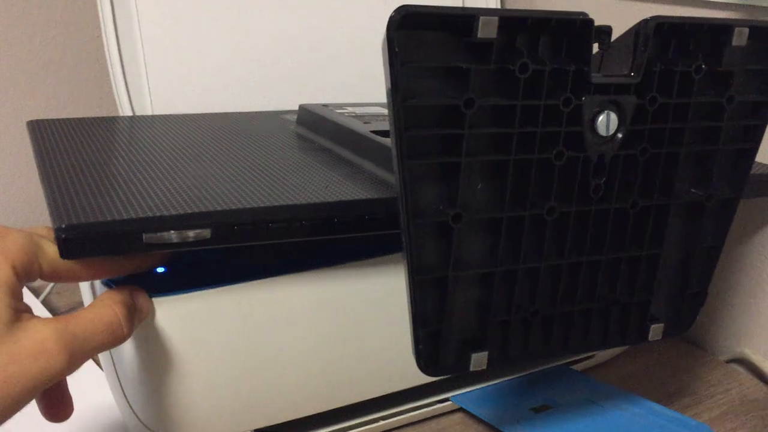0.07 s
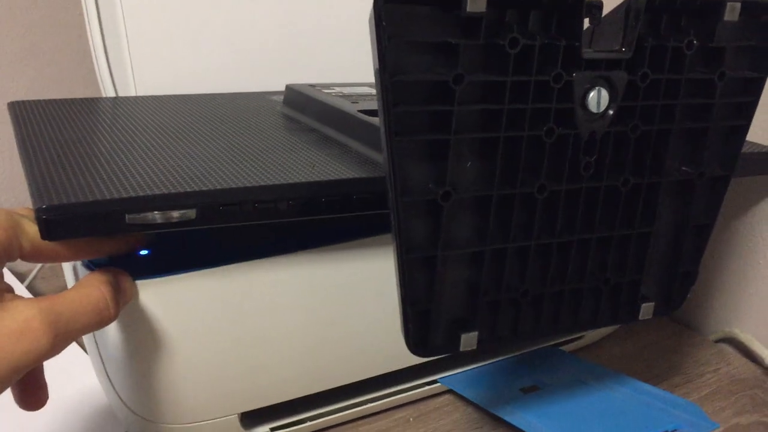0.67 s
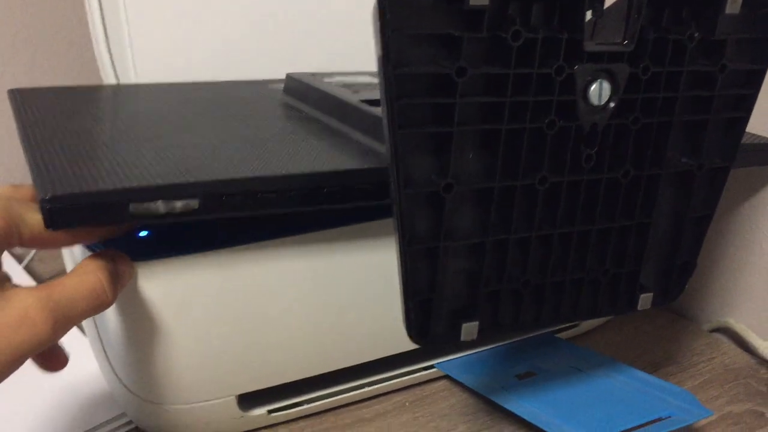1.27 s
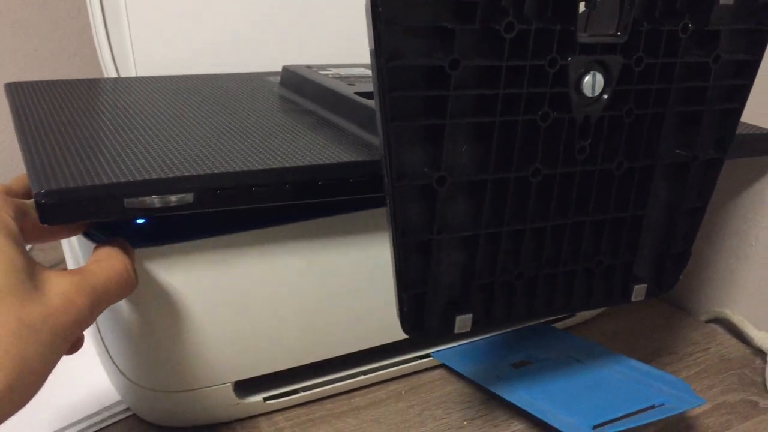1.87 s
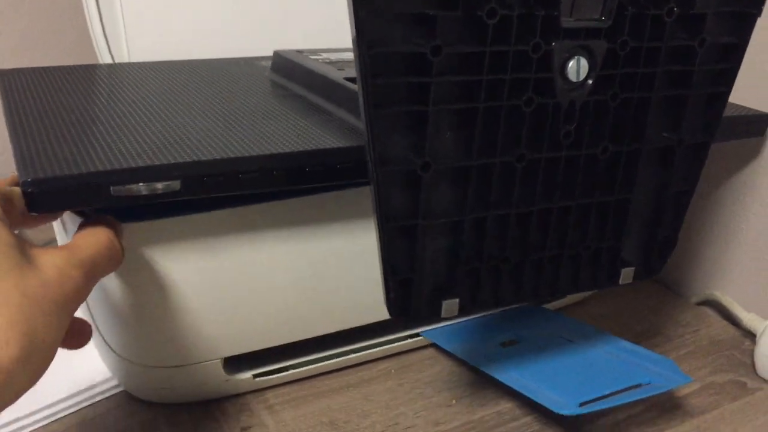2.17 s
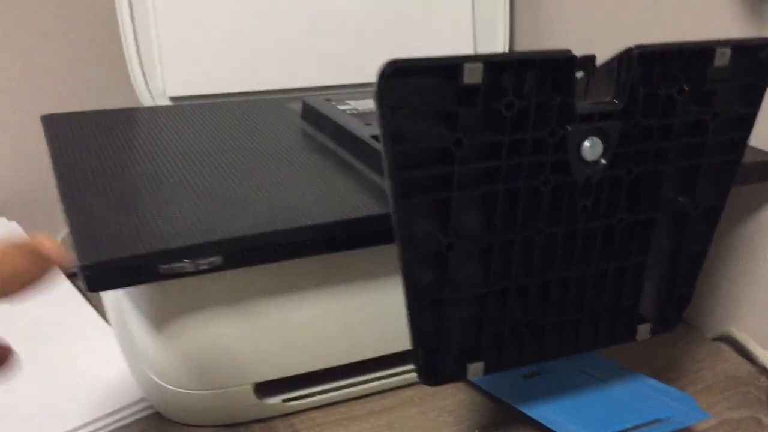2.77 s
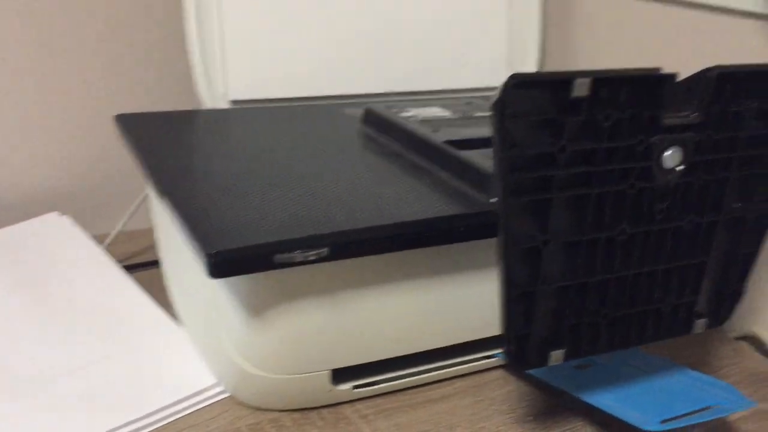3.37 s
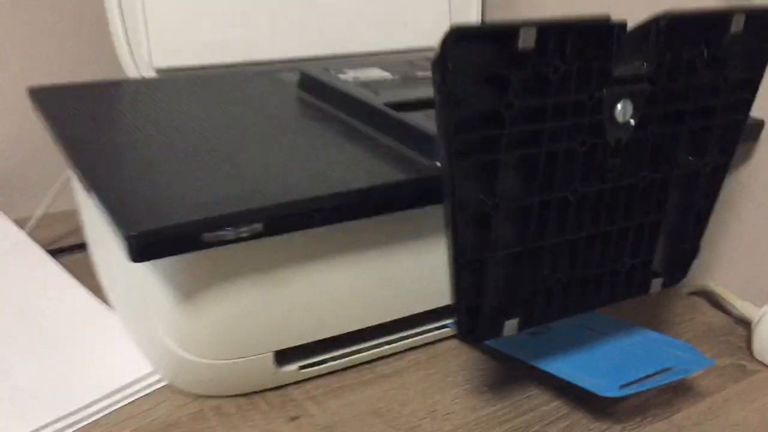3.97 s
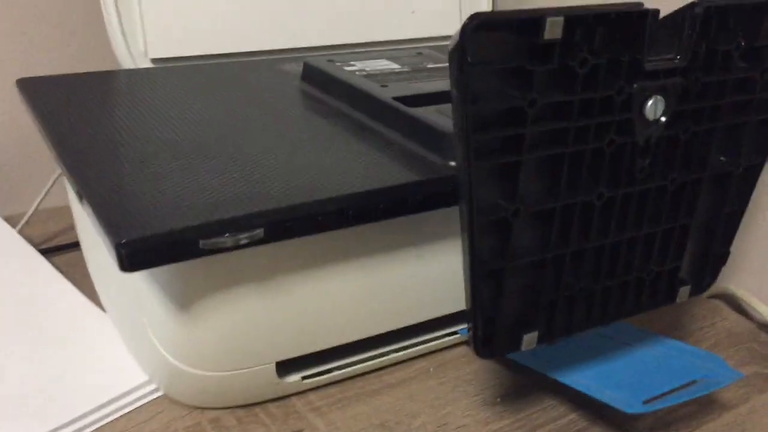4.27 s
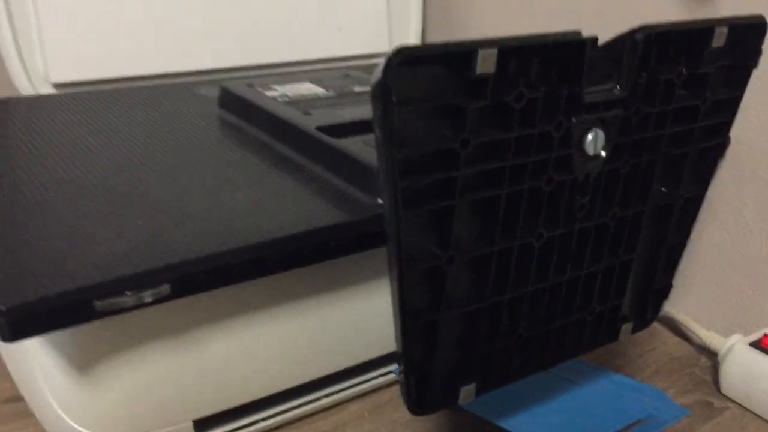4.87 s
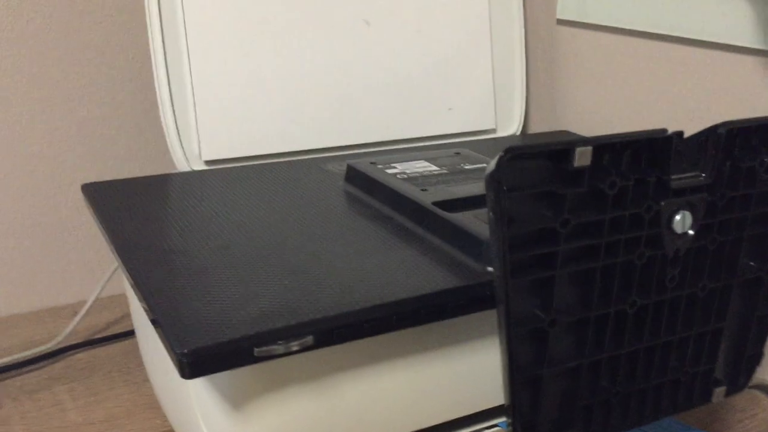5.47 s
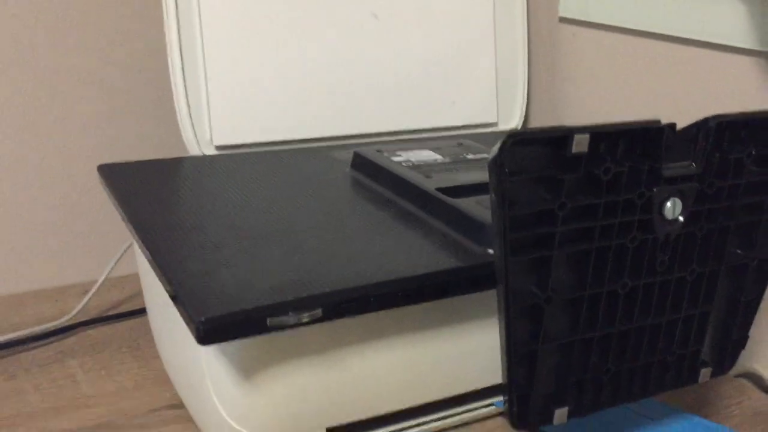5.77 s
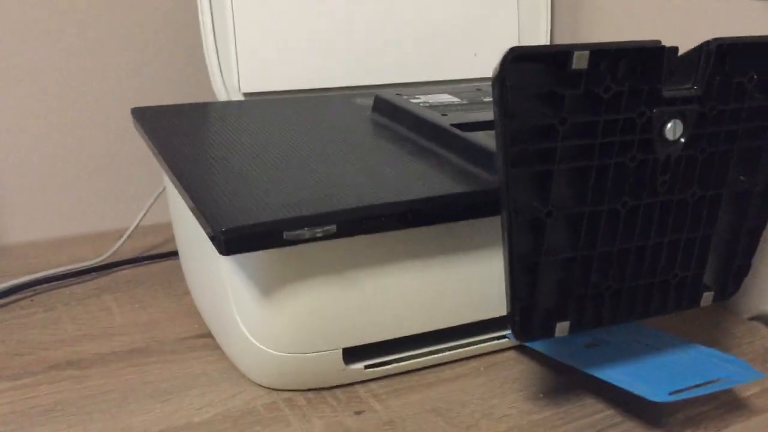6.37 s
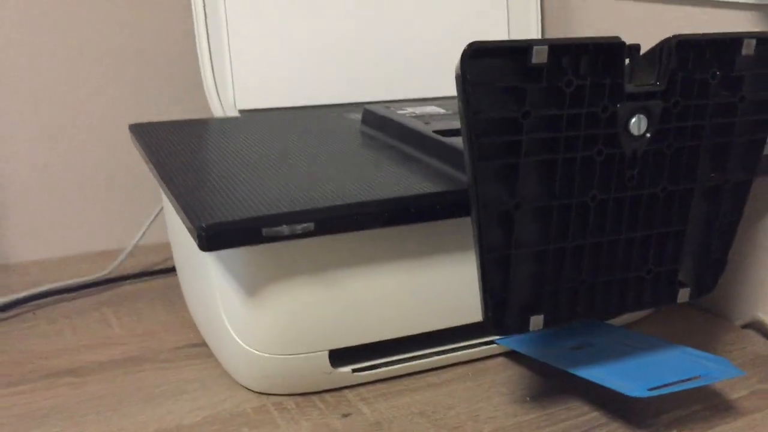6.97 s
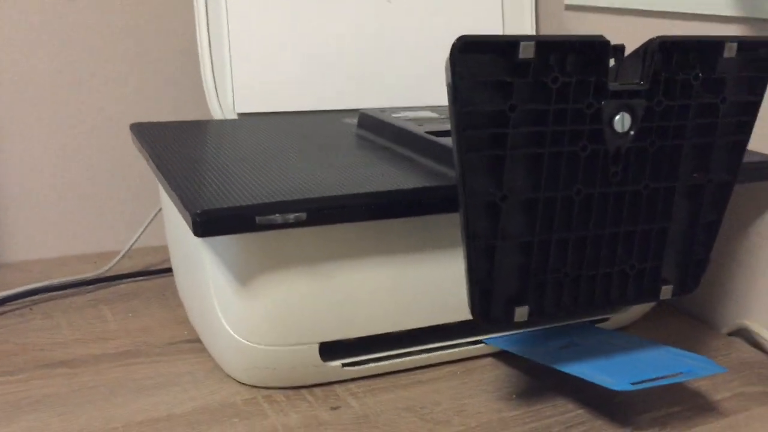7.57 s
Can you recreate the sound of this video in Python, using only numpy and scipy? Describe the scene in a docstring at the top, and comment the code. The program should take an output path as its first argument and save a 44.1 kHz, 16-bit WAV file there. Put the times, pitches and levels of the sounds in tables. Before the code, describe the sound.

Over a steady low electrical hum in a small room, a hand clicks and rubs a printer's plastic cover with soft thumps, then lets it drop with a double slam. After a last click, gears clack into place and the feed motor whirs. A sheet of paper hisses, snaps and rasps through as the motor winds down. The gears clatter again and a slower drive purrs on with small chugs, all heard from nearby.

```python
"""A desktop inkjet printer in a small room, over a steady mains hum.
A hand clicks and rubs the plastic cover amid low thumps, then lets it drop with a double slam (2.4 s).
After a last click a small spring twangs; gears engage with clacks (3.9 s) and the feed motor whirs.
A sheet slides through, hissing, snapping and rasping by stick-slip friction, and the motor coasts down.
The gears shift again (5.7 s) and a slower drive purrs on, chugging where it catches."""
import sys
import numpy as np
from scipy import signal
from scipy.fft import rfft, irfft
from scipy.io import wavfile
from scipy.ndimage import uniform_filter1d

SR = 44100
rng = np.random.default_rng(int(sys.argv[2]) if len(sys.argv) > 2 else 0)


def output_pcm(signal):
    """Save a mono or channel-first signal as 16-bit PCM at the path in sys.argv[1].

    Samples are clipped to [-1, 1] before scaling.
    """
    pcm = np.clip(np.atleast_2d(signal).T, -1, 1) * 32767
    wavfile.write(sys.argv[1], SR, np.round(pcm).astype(np.int16))


N = 340893
T = np.arange(N) / SR


def undb(db):
    """Amplitude ratio of a level in decibels."""
    return 10 ** (np.asarray(db) / 20)


def unit(x):
    """Normalisation to an rms of 1."""
    return x / np.sqrt(np.mean(x ** 2) + 1e-20)


def add(out, start_s, x):
    """Superposition of x on out, from start_s onward."""
    i = int(start_s * SR)
    out[i:i + len(x)] += x[:N - i]


def band(x, lo_hz, hi_hz):
    """Causal Butterworth band-pass."""
    return signal.sosfilt(signal.butter(3, [lo_hz, hi_hz], "band", fs=SR, output="sos"), x)


def resonate(x, hz, width_hz):
    """Forced response of a second-order resonator with gain 1 at its centre."""
    return signal.lfilter(*signal.iirpeak(hz, hz / width_hz, fs=SR), x)


def damped_mode(t, hz, t60):
    """Free vibration of one mode: a sinusoid that falls 60 dB in t60 seconds."""
    return np.sin(2 * np.pi * hz * t) * np.exp(-np.log(1000) * t / t60)


def colour(x, points, size=4096):
    """Minimum-phase filter through (Hz, dB) points, built by folding the cepstrum."""
    hz, db = np.transpose(points)
    log_hz = np.log(np.fft.rfftfreq(size, 1 / SR) + 1)
    log_gain = np.log(undb(np.interp(log_hz, np.log(hz), db)))
    cepstrum = irfft(log_gain)[:size // 2]
    cepstrum[1:] *= 2
    response = irfft(np.exp(rfft(cepstrum, size)))
    return signal.fftconvolve(x, response)[:len(x)]


def drift(rate_hz):
    """Low-pass random fluctuation: rate_hz new values a second, smoothed twice."""
    hold = int(SR / rate_hz)
    steps = np.repeat(rng.standard_normal(N // hold + 1), hold)
    return 1.986 * uniform_filter1d(uniform_filter1d(steps, hold), hold)[:N]


def swell(middle_s, length_s):
    """Raised-cosine envelope of a stroke that grows and fades."""
    return np.cos(np.pi * np.clip((T - middle_s) / length_s, -.5, .5)) ** 2


def running(on_s, off_s=np.inf, spin_up_s=0.041, coast_db_per_s=222):
    """Envelope of a mechanism with inertia: linear rise, hold, exponential decay."""
    rise = np.clip((T - on_s) / spin_up_s, 0, 1)
    return rise * undb(-coast_db_per_s * np.maximum(T - off_s, 0))


def impulse_train(rate_hz, jitter_s, scatter_db):
    """Quasi-periodic excitation: one click per tooth or slip, uneven in time and strength."""
    count = int(N / SR * rate_hz)
    timing, strength = rng.standard_normal((count, 2)).T
    at = ((np.arange(count) / rate_hz + jitter_s * timing) * SR).astype(int)
    clicks = np.zeros(N)
    np.add.at(clicks, np.clip(at, 0, N - 1), undb(scatter_db * strength))
    return unit(clicks)


# Reverberation of case and room. Each row: frequency in Hz, 60 dB decay time in seconds.
REVERB_TIMES = [(100, 0.47), (200, 0.38), (400, 0.33), (1000, 0.3), (2000, 0.33), (3000, 0.3), (8000, 0.22),
                (15000, 0.068)]
def reflections():
    """Diffuse reverberation: a noise tail of unit energy, each half octave decaying at its own rate."""
    t = T[:SR // 2]
    hz, t60 = np.transpose(REVERB_TIMES)
    spectrum, f = rfft(rng.standard_normal(len(t))), np.fft.rfftfreq(len(t), 1 / SR)
    tail = 0
    for lo in 45 * 2 ** np.arange(0, 9, .5):
        part = irfft(spectrum * (f >= lo) * (f < lo * np.sqrt(2)), len(t))
        band_t60 = np.interp(np.log(lo), np.log(hz), t60)
        tail = tail + part * np.exp(-np.log(1000) * t / band_t60)
    tail *= 1 - np.exp(-t / 0.0012)
    return tail / np.linalg.norm(tail)


def in_room(x, wet_db):
    """Superposition of the direct sound and its reverberant field."""
    return x + undb(wet_db) * signal.fftconvolve(x, reflections())[:len(x)]


# Spectra of the room's air and rumble. Each row: frequency in Hz, relative level in dB.
AIR_SPECTRUM = [(120, -58.5), (200, -5.5), (387, -4.5), (432, -5), (659, -14), (735, -13.5), (916, -14),
                (6170, -25.5), (16000, -43)]
RUMBLE_SPECTRUM = [(25, -7.5), (55, 0.5), (100, 4), (170, 3.5), (260, 0.5), (500, -30.5)]
def hum_and_air(hum_hz, hum_db, air_db, rumble_db):
    """Stationary background: a pure tone of mains hum over faint broadband air and rumble."""
    hum = np.sqrt(2) * np.sin(2 * np.pi * hum_hz * T) * undb(hum_db + 0.3 * drift(1.3))
    air = unit(colour(rng.standard_normal(N), AIR_SPECTRUM)) * undb(air_db)
    rumble = unit(colour(rng.standard_normal(N), RUMBLE_SPECTRUM)) * undb(rumble_db + 0.5 * drift(1.95))
    return hum + air + rumble


# Thud, body, knock and snap bands of an impact. Each row: lower edge in Hz, upper edge in Hz.
IMPACT_BANDS = [(45, 400), (400, 1200), (1200, 4000), (4000, 16000)]
FIRM_CONTACT_S = .004  # a longer contact loses snap, a shorter one gains it
PANEL_LAG_S = 0.00515  # the large panels take a moment to start thudding
PART_Q = 2.25  # sharpness of the struck part's own note
def impacts(hits, spectrum, modes, ring_db, wet_db, trim_db, scuff_db, scuff_s, rise, snap_db, dull_db):
    """Impact excitation: parts scuff, chatter, then ring; snap loses dull_db per doubling of contact."""
    out, t = np.zeros(N), T[:SR // 2]
    lead = SR // 50
    attack = slice(lead, lead + SR // 40)
    for start_s, level_db, bright_db, contact_s, note_hz, thud_db in hits:
        contact_s = max(contact_s, .001)
        dulling_db = dull_db * np.log2(contact_s / FIRM_CONTACT_S)
        band_levels_db = level_db + np.array([thud_db, 0, bright_db, bright_db + snap_db - dulling_db])
        build_up = 1 - np.exp(-t / (rise * contact_s))
        chatter = rng.standard_normal(len(t)) * np.exp(-t / contact_s) * build_up
        chatter /= np.linalg.norm(chatter)
        ringing = 0
        for hz, db, t60 in modes:
            strength, detune = rng.standard_normal(2)
            ring = damped_mode(t, hz * (1 + 0.0055 * detune), t60)
            ringing = ringing + rng.choice([-1, 1]) * undb(db + 2 * strength) * ring
        # the parts slide on each other just before they meet
        scuff = undb(scuff_db) * rng.standard_normal(lead) * np.exp(-t[:lead] / scuff_s)[::-1]
        strike = chatter + undb(wet_db) * reflections() + undb(ring_db) * ringing
        sound = np.concatenate([scuff, strike])
        note = undb(1.0) * resonate(sound, note_hz, note_hz / PART_Q)
        sound = colour(sound + note, spectrum)
        for (lo, hi), db, lag_s in zip(IMPACT_BANDS, band_levels_db, (PANEL_LAG_S, 0, 0, 0)):
            part = band(sound, lo, hi)
            add(out, start_s + lag_s - lead / SR, part * undb(db + trim_db) / np.std(part[attack]))
    return out


# Clicks and double slam of the cover. Each row: start in seconds, relative level in dB,
# brightness in dB, contact time in seconds, note of the struck part in Hz, thud in dB.
COVER_HITS = [(0.398, -53.5, -21, 0.0032, 402, 5.5), (0.519, -45, 2.5, 0.0031, 1100, -26),
              (0.721, -43.5, 0, 0.0034, 1030, 2), (0.925, -59.5, 6, 0.0058, 1040, -15),
              (1.107, -45, -3, 0.0047, 800, -3), (1.139, -40.5, -1, 0.0036, 1400, -3),
              (1.385, -58, -13, 0.012, 704, 1), (1.866, -43.5, 1, 0.0029, 1570, -7),
              (1.883, -41.5, 1, 0.0033, 820, -8), (2.088, -55, 4.5, 0.0042, 1310, -17),
              (2.138, -57.5, -5, 0.0026, 900, -10), (2.405, -29.5, 1.5, 0.0034, 1380, -2),
              (2.589, -37, 7.5, 0.004, 1760, -4), (2.603, -35.5, -5, 0.0079, 570, -2.5),
              (3.717, -49.5, -6, 0.0023, 657, -5), (3.728, -56, 5.5, 0.0045, 1370, -2)]
# Spectrum of a contact on the cover. Each row: frequency in Hz, gain in dB.
COVER_SPECTRUM = [(45, -15.5), (130, 17.5), (220, 5), (330, 12), (460, 8), (640, 9.5), (830, 9),
                  (1100, 0.5), (1450, -6.5), (2300, -4), (3500, -12), (6000, -18), (10400, -24),
                  (15000, -27)]
# Normal modes of the cover. Each row: frequency in Hz, relative level in dB, 60 dB decay in seconds.
COVER_MODES = [(207.2, 2.5, .35), (255.5, -7.5, 0.5), (354, 1.5, .26), (474, 0.5, 0.15), (569, 4.5, 0.2),
               (711, 3.5, 0.19), (878, 0.5, 0.16), (1040, -0.5, 0.13), (1450, 6.5, 0.091),
               (1670, -1.5, 0.23), (1880, -1, 0.29), (2052, 0, 0.3), (2410, -3, 0.31), (2780, 5, 0.15),
               (3210, 3.5, 0.16), (3910, -2, 0.19), (4350, -4, 0.24), (5240, 3.5, 0.102), (6800, 8, 0.0934)]
def cover_clicks():
    """Plate vibration: each contact with the case excites the damped modes of the plastic cover."""
    return impacts(COVER_HITS, COVER_SPECTRUM, COVER_MODES, ring_db=-47.5, wet_db=-4.0, trim_db=-1,
                   scuff_db=-57.0, scuff_s=0.0043, rise=0.28, snap_db=-13.5, dull_db=18.5)


# Soft low thumps from handling, and dull thuds under the clicks and clacks.
# Each row: start in seconds, relative level in dB, pitch in Hz, decay time in seconds.
LOW_THUMPS = [(0.402, -43.5, 211.5, 0.014), (0.725, -39.5, 226.5, 0.011), (1.144, -39, 238, 0.008),
              (1.39, -51, 240, 0.0066), (2.106, -42.5, 156, 0.0055), (2.412, -42, 178, .007),
              (2.467, -41, 138.2, .07), (2.601, -38.5, 178, 0.0033), (2.656, -49, 211, 0.011),
              (3.114, -45, 148, 0.012), (3.317, -45.5, 131, .006), (3.438, -50, 175, 0.0073),
              (3.51, -48.5, 132, 0.0074), (3.599, -47, 129, 0.011), (4.243, -40, 147, 0.0063),
              (4.52, -39.5, 161, 0.0037), (4.578, -46, 150, 0.0072), (4.661, -47, 168, 0.0027),
              (5.801, -34.5, 127.5, 0.036), (5.832, -55, 138, 0.0063), (7.221, -39, 163, 0.0046)]
def low_thumps(wet_db, trim_db):
    """Damped oscillation: each thump is one low mode that rises softly and dies away quickly."""
    out, t = np.zeros(N), T[:SR // 3]
    for start_s, db, hz, decay_s in LOW_THUMPS:
        mode = np.sin(2 * np.pi * hz * t) * np.exp(-t / decay_s) * (1 - np.exp(-t / 0.0015))
        thump = in_room(mode, wet_db)
        add(out, start_s, thump * undb(db + trim_db) / np.std(thump[:SR // 25]))
    return out


# Fingertips lifting off. Each row: start in seconds, level in dB, note in Hz.
FINGER_TICKS = [(0.664, -68.5, 8500), (1.962, -69, 10500), (2.159, -71, 14000), (2.211, -74, 7000),
                (2.261, -64, 9000), (2.278, -66, 13500)]
def finger_ticks(decay_s):
    """Release of adhesion: fingertips peel off the textured plastic in thin, high ticks."""
    out, t = np.zeros(N), T[:SR // 8]
    for start_s, db, hz in FINGER_TICKS:
        peel = rng.standard_normal(len(t)) * np.exp(-t / decay_s)
        tick = in_room(resonate(peel, hz, hz / 3), wet_db=-5)
        add(out, start_s, tick * undb(db) / np.std(tick[:SR // 100]))
    return out


# Strokes on the case. Each row: middle in seconds, length in seconds, relative level in dB.
RUB_STROKES = [(1.89, 0.16, -53), (2.23, 0.25, -65.5), (2.388, 0.15, -55.5), (2.614, 0.23, -45),
               (3.3, 0.12, -67), (3.473, 0.19, -67)]
# Spectrum of the rubbing. Each row: frequency in Hz, relative level in dB.
RUB_SPECTRUM = [(100, -2.5), (400, 13.5), (900, 0.5), (1400, 1), (1950, 1), (2400, -4), (3000, -9),
                (6000, -17), (10000, -20.5), (16000, -35)]
def rubbing(grain_db, uneven_db):
    """Sliding friction: skin and cover move over the case in faint, uneven slips."""
    strokes = sum(undb(db) * swell(middle_s, length_s) for middle_s, length_s, db in RUB_STROKES)
    slips = rng.standard_normal(N) * undb(grain_db * rng.standard_normal(N) + uneven_db * drift(90))
    return in_room(strokes * unit(colour(slips, RUB_SPECTRUM)), wet_db=-5.5)


# Modes of the spring. Each row: frequency in Hz, relative level in dB, 60 dB decay in seconds.
SPRING_MODES = [(2900, -2, .28), (3270, -5, .25), (3620, -8, .2), (4030, -4, .27), (4200, -4, .3)]
def spring_twang(start_s, level_db):
    """Free vibration: a small metal spring rings in inharmonic modes after the cover's last click."""
    out, t = np.zeros(N), T[:SR // 2]
    for hz, db, t60 in SPRING_MODES:
        add(out, start_s, undb(level_db + db) * damped_mode(t, hz, t60))
    return out


# Clacks of the gear train, and one thin, high tick of paper at 5.57 s. Each row: start in seconds,
# relative level in dB, brightness in dB, contact time in seconds, struck part's note in Hz, thud in dB.
MECHANISM_HITS = [(3.933, -51.5, 16, 0.0059, 1920, -9), (3.940, -37.5, 9.5, 0.0015, 2400, -16),
                  (3.977, -42.5, 9.5, 0.0027, 1820, -7), (4.021, -29, -3, 0.0047, 1220, -9),
                  (4.041, -46.5, 7, 0.0025, 1500, -12), (4.053, -57, 3, 0.0026, 1800, -4),
                  (4.075, -51, 7, 0.0026, 2000, -11), (4.098, -44.5, 10, 0.0075, 1230, -5),
                  (4.116, -42, 0.5, 0.003, 1020, -16), (4.160, -35, 3, 0.0087, 1580, -18),
                  (4.273, -39.5, -2.5, 0.0039, 750, -23), (4.335, -35.5, 3, 0.0032, 4320, -17),
                  (4.3555, -26, -2.5, 0.0048, 1470, -20), (4.401, -33.5, -1.5, .0087, 716, -12),
                  (4.4315, -31, 3, 0.005, 1430, -10), (4.445, -35, 2, 0.0057, 1130, -1.5),
                  (5.4602, -50, 12, 0.002, 2600, -1.5), (5.571, -55.5, 9, .00074, 5000, -3.5),
                  (5.736, -44, -8.5, 0.0036, 784, -4), (5.746, -45.5, -8.5, 0.0058, 740, -4),
                  (5.796, -39, -7, 0.0035, 726, 0), (5.862, -45, -2, .01, 730, -4),
                  (5.934, -38, -1, .0025, 710, -18), (5.949, -24.5, -4, 0.0026, 780, -10.5),
                  (6.017, -38, 8, .0044, 2480, -7.5), (6.026, -37, 3.5, 0.0031, 2120, -15),
                  (6.106, -39.5, -13, 0.0088, 1410, 0), (6.133, -34, -11, 0.0041, 850, -4),
                  (6.147, -35.5, 1.5, 0.0042, 1240, -25), (6.174, -34, -2, 0.0042, 2080, -7),
                  (6.205, -39.5, -4.5, .0041, 730, -14), (6.24, -40, -1, 0.0035, 2770, -18),
                  (7.712, -42, -5, 0.0076, 724, -6)]
# Spectrum of a contact between gears. Each row: frequency in Hz, gain in dB.
GEAR_SPECTRUM = [(45, -5.5), (120, -1), (300, 4), (510, -5), (730, 2), (1000, -2.5), (1300, -2), (2100, 4),
                 (3200, -5.5), (5000, -18), (6600, -20), (9300, -24), (10400, -28.5), (15000, -29.5)]
# Modes of the chassis. Each row: frequency in Hz, relative level in dB, 60 dB decay in seconds.
CHASSIS_MODES = [(647, -17, 0.34), (709, 6, 0.085), (1250, 4, 0.15), (1730, -48, 0.19), (1989, 10, 0.051),
                 (2470, 2.5, 0.15), (3280, 6, 0.067), (3560, -32, 0.15), (4380, 5, 0.18), (6180, 10, 0.09),
                 (6960, -15, .12), (8400, -26, 0.062)]
def mechanism_clacks():
    """Structure-borne sound: engaging gears collide and set the chassis ringing; the paper ticks once."""
    return impacts(MECHANISM_HITS, GEAR_SPECTRUM, CHASSIS_MODES, ring_db=-47, wet_db=-2.5, trim_db=-0.5,
                   scuff_db=-23.0, scuff_s=0.0029, rise=.25, snap_db=-8.5, dull_db=5.0)


# Shifts of the gear train. Each row: start in seconds, end in seconds, relative level in dB.
GEAR_SHIFTS = [(3.934, 4.077, -42), (5.977, 6.196, -45.5)]
def gear_chatter(scatter_db):
    """Intermittent contact: teeth not yet meshed skip over each other in irregular ticks."""
    ticks = impulse_train(170, jitter_s=.003, scatter_db=scatter_db)
    effort = sum(undb(db) * running(on_s, off_s) for on_s, off_s, db in GEAR_SHIFTS)
    return in_room(effort * unit(colour(ticks, GEAR_SPECTRUM)), wet_db=3.5) * undb(-5.5)


# Spectrum of the feed rattle. Each row: frequency in Hz, relative level in dB.
FEED_SPECTRUM = [(29, -60), (50, -68), (113, -2.5), (150, -12.5), (322, -6.5), (362, -6), (399, -16),
                 (535, -9.5), (613, -9), (919, -12.5), (1550, -13), (1710, -18), (1930, -12), (2280, -20.5),
                 (15000, -42.5)]
# Resonances of the gear frame. Each row: frequency in Hz, bandwidth in Hz, relative gain in dB.
FRAME_RESONANCES = [(618, 53, -14), (647, 76, 5), (717, 27, 1), (758, 55, 4), (1250, 74, -8),
                    (1310, 79, -17)]
# Gear tones. Each row: multiple of the shaft rate, relative level in dB.
FEED_HARMONICS = [(2, -21), (5, -24), (6, -21), (8, -20), (10, -21), (15, -15), (18, -22), (20, -21)]
FEED_ON_S, FEED_OFF_S, FEED_GAIN_DB = 3.93, 5.22, -36
CRAWL_OFF_S, CRAWL_GAIN_DB = 5.6, -71  # a faint last stretch eases the sheet out
def feed_motor(shaft_hz, tone_db, rub_db, frame_db):
    """Gear-mesh noise: a rattle, amplitude-modulated once a turn, over harmonics of the shaft rate."""
    angle = 2 * np.pi * np.cumsum(shaft_hz * (1 + 0.002214 * drift(9))) / SR
    teeth = impulse_train(6 * shaft_hz, jitter_s=.001, scatter_db=4.0)
    friction = undb(rub_db) * rng.standard_normal(N)
    throb = undb(0.85 * np.sin(angle) + 0.9 * drift(25))
    rattle = colour((teeth + friction) * throb, FEED_SPECTRUM)
    frame = sum(undb(db) * resonate(rattle, hz, width) for hz, width, db in FRAME_RESONANCES)
    tones = sum(undb(db + 0.48 * drift(15)) * np.sin(order * angle + rng.uniform(0, 2 * np.pi))
                for order, db in FEED_HARMONICS)
    whir = undb(-1.5) * unit(in_room(rattle + undb(frame_db) * frame, wet_db=4.0))
    pull = undb(FEED_GAIN_DB) * running(FEED_ON_S, FEED_OFF_S)
    crawl = undb(CRAWL_GAIN_DB) * running(FEED_OFF_S, CRAWL_OFF_S)
    return (pull + crawl) * (whir + undb(tone_db) * tones)


# Passage of the sheet. Each row: time in seconds, hiss level in dB, scrape level in dB.
SHEET_LEVELS = [(4.5, -71, -59), (4.735, -53, -48), (4.8, -40.5, -41.5), (4.98, -34.5, -39.5),
                (5.08, -36, -36), (5.17, -46, -37.5), (5.25, -43.5, -47.5), (5.38, -46, -46),
                (5.52, -63.5, -54.5), (5.74, -76, -69)]
# Spectra of the hiss and the scrape. Each row: frequency in Hz, relative level in dB.
HISS_SPECTRUM = [(1500, -3), (2800, -33), (4000, 8.5), (5000, 4), (6500, 10), (8000, 3.5), (9300, 9),
                 (10400, 0.5), (12000, 6.5), (16000, -2)]
SCRAPE_SPECTRUM = [(300, -3.5), (800, 3.5), (1250, 4), (1700, 7), (2400, 5.5), (3200, 2.5), (5000, -6),
                   (9000, -18)]
def sheet_slide(grain_db):
    """Friction noise: paper fibres catch on rollers and guides in dense, tiny slips."""
    times, hiss_db, scrape_db = np.transpose(SHEET_LEVELS)
    passing = (T > times[0]) * (T < times[-1])
    out = 0
    for levels_db, spectrum in ((hiss_db, HISS_SPECTRUM), (scrape_db, SCRAPE_SPECTRUM)):
        envelope = undb(np.interp(T, times, levels_db)) * passing
        slips = rng.standard_normal(N) * undb(grain_db * rng.standard_normal(N) + 1.5 * drift(70))
        out = out + envelope * unit(in_room(colour(slips, spectrum), wet_db=-7))
    return out


# Crisp snaps of the sheet. Each row: start in seconds, relative level in dB, decay time in seconds.
SHEET_SNAPS = [(4.523, -59, .002), (4.611, -46, .0015), (4.663, -46, 0.0017), (4.776, -36, 0.0029),
               (4.8995, -23.5, 0.002), (4.921, -35, 0.0015), (4.943, -24, 0.0019), (4.969, -24.5, 0.0046),
               (5.031, -41, 0.0011), (5.114, -26.5, 0.002), (5.145, -36, 0.0016), (5.167, -41, .0012),
               (5.197, -35.5, 0.00078), (5.25, -42, .005), (5.36, -35.5, .0051), (5.384, -54, .002)]
# Spectrum of a snap. Each row: frequency in Hz, gain in dB.
SNAP_SPECTRUM = [(100, -12), (350, -5), (750, 1), (1500, 2.5), (2500, 2.5), (4300, 0), (6000, -6.5),
                 (15000, -27)]
def sheet_snaps(crack_db, trim_db):
    """Transient radiation: the sheet snaps with a heavily damped crack and a short noisy crinkle."""
    out, t = np.zeros(N), T[:SR // 4]
    crack = undb(crack_db) * np.sin(2 * np.pi * 1900 * t) * np.exp(-t / 0.00019)
    for start_s, db, decay_s in SHEET_SNAPS:
        crinkle = rng.standard_normal(len(t)) * np.exp(-t / decay_s)
        crinkle /= np.linalg.norm(crinkle)
        snap = in_room(colour(crinkle + crack, SNAP_SPECTRUM), wet_db=-10)
        add(out, start_s, snap * undb(db + trim_db) / np.std(snap[:SR // 100]))
    return out


# Rasps of the sheet's edge. Each row: middle in seconds, length in seconds, level in dB, note in Hz.
EDGE_RASPS = [(5.078, 0.068, -27.5, 1320), (5.174, 0.096, -35, 1110), (5.27, 0.12, -40.5, 2450),
              (5.381, 0.12, -42.5, 2330)]
def edge_rasps(q, scatter_db):
    """Stick-slip: the edge judders over a guide, and the free stretch of paper resonates at its note."""
    out = 0
    for middle_s, length_s, db, hz in EDGE_RASPS:
        slips = impulse_train(420, jitter_s=.0008, scatter_db=scatter_db)
        rasp = resonate(resonate(slips, hz, hz / q), hz, hz / q)
        out = out + undb(db) * swell(middle_s, length_s) * unit(rasp)
    return in_room(out, wet_db=-16)


# Resonances of the slow drive. Each row: frequency in Hz, nominal bandwidth in Hz, gain in dB.
DRIVE_RESONANCES = [(170, 20, 9), (210, 14, 3.5), (310, 60, -4), (395, 60, -1), (598, 44, 5.5),
                    (675, 50, 5.5), (733, 36, 4), (830, 70, -7), (970, 70, -8), (1150, 50, -5),
                    (1270, 70, -6), (1440, 90, 0), (1590, 90, 2.5), (1830, 100, -2), (2075, 40, -14),
                    (2540, 70, -10), (2690, 90, -16), (2900, 120, -25), (3480, 120, -23), (3950, 200, -25)]
# The drive's broadband body and its whine. Each row: frequency in Hz, relative level in dB.
DRIVE_SPECTRUM = [(40, -64), (60, 12.5), (130, -16), (300, 8), (1000, -1), (1900, 2), (2300, -55),
                  (4300, -64), (6000, -26), (9000, -17)]
WHINE_TONES = [(171.5, -13), (606, -24), (658, -25), (732, -22), (1157, -28), (1561, -26)]
def slow_drive(on_s, gain_db, tooth_hz, contact_share, body_db, wobble_db, tone_db):
    """Forced vibration: a slow gear knocks and scuffs tooth by tooth in the case, over a faint whine."""
    tooth_phase = (tooth_hz * T) % 1
    scuffs = unit(rng.standard_normal(N) * np.exp(-tooth_phase / contact_share))
    knocks = unit(impulse_train(tooth_hz, jitter_s=.0007, scatter_db=1.5) + undb(5) * scuffs)
    knocks *= undb(wobble_db * drift(28))
    load, chugs = gear_catches(width_s=.009, decay_s=.008, trim_db=-.5)
    soft = in_room(load * knocks + undb(1.5) * chugs, wet_db=-7.5)
    hard = in_room(load * knocks + chugs, wet_db=-11.5)
    ringing = 0
    for hz, width, db in DRIVE_RESONANCES:
        force = hard if hz > 1000 else soft  # the upper resonances take the drier push
        ringing = ringing + undb(db) * resonate(resonate(force, hz, 1.5 * width), hz, 1.5 * width)
    body = undb(body_db) * colour(soft, DRIVE_SPECTRUM)
    muffled = band(ringing + body, 40, 4000)  # the closed case keeps the treble in
    whine = 0
    for hz, db in WHINE_TONES:
        amplitude = undb(db + 0.78 * drift(9.3))
        whine = whine + amplitude * np.sin(2 * np.pi * hz * T + 1.7 * drift(3.7) + 0.4 * drift(45))
    return undb(gain_db) * running(on_s) * (unit(muffled) + undb(tone_db) * whine)


# Tight spots of the slow gear. Each row: time in seconds, relative strength in dB.
GEAR_CATCHES = [(6.335, 3.5), (6.419, -3), (6.452, -5), (6.49, -1.5), (6.546, -0.5), (6.6, 6), (6.626, 0),
                (6.668, 4.5), (6.758, 4.5), (6.804, 7), (6.822, 0), (6.87, 0), (6.935, 3.5), (6.983, -3),
                (7.04, 4.5), (7.07, 2.5), (7.126, 1.5), (7.184, 2), (7.251, 4), (7.295, -2.5), (7.335, 0.5),
                (7.387, 4), (7.425, 0.5), (7.476, 4), (7.528, 2), (7.573, 7), (7.604, 3), (7.664, 5)]
def gear_catches(width_s, decay_s, trim_db):
    """Load modulation: a catch varies the tooth force, and the gear slips free with one soft chug."""
    load_db, chugs, t = np.zeros(N), np.zeros(N), T[:SR // 20]
    for at_s, db in GEAR_CATCHES:
        load_db += .5 * db * np.exp(-((T - at_s) / width_s) ** 2)
        blow = rng.standard_normal(len(t)) * np.exp(-t / decay_s) * (1 - np.exp(-t / 0.00096))
        add(chugs, at_s - decay_s, blow * undb(db + trim_db) / np.std(blow[:SR // 50]))
    return undb(load_db), chugs


def scene():
    """Linear superposition of all sources at one microphone, the same on both channels."""
    mono = hum_and_air(hum_hz=120, hum_db=-47.0, air_db=-71.0, rumble_db=-66.5)
    mono += cover_clicks() + low_thumps(wet_db=-2.0, trim_db=-1.0)
    mono += finger_ticks(decay_s=0.0027) + rubbing(grain_db=8.5, uneven_db=1.5)
    mono += spring_twang(start_s=3.729, level_db=-62)
    mono += mechanism_clacks() + gear_chatter(scatter_db=4.5)
    mono += feed_motor(shaft_hz=39.95, tone_db=3.5, rub_db=-9.0, frame_db=-2.0)
    mono += sheet_slide(grain_db=3.5) + sheet_snaps(crack_db=-12, trim_db=-2.5)
    mono += edge_rasps(q=1.57, scatter_db=2)
    mono += slow_drive(on_s=5.75, gain_db=-47.5, tooth_hz=73.6, contact_share=.38,
                       body_db=-16.0, wobble_db=0.4, tone_db=1.5)
    return np.array([mono, mono])


def record(dry):
    """Band limiting: the microphone opens after a moment and cuts the deep bass and the top treble."""
    opening = np.clip((T - .075) / .01, 0, 1)
    thinned = signal.sosfilt(signal.butter(4, 40, "high", fs=SR, output="sos"), dry * opening)
    return signal.sosfilt(signal.ellip(10, .2, 80, 16150, fs=SR, output="sos"), thinned)


dry = scene()
out = record(dry)
output_pcm(out)
```